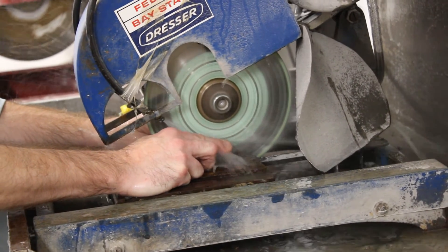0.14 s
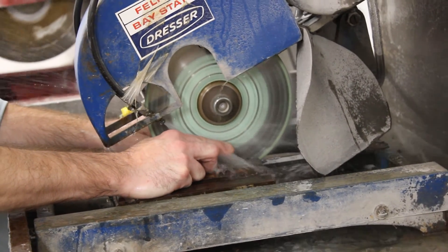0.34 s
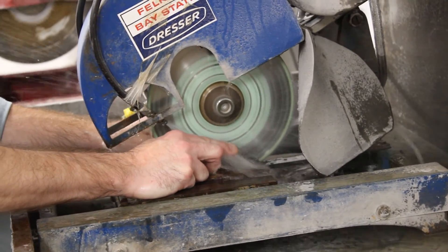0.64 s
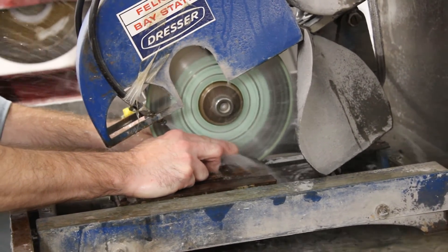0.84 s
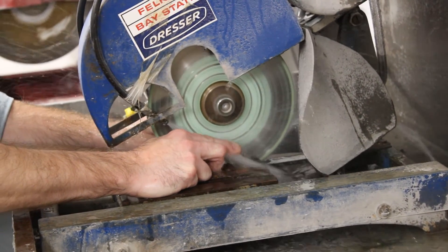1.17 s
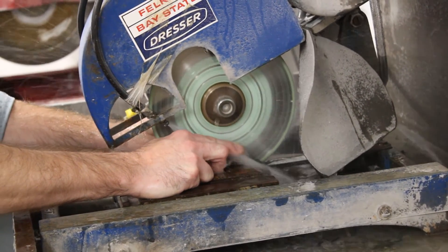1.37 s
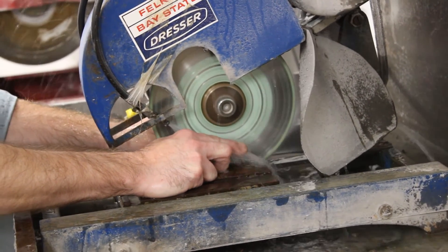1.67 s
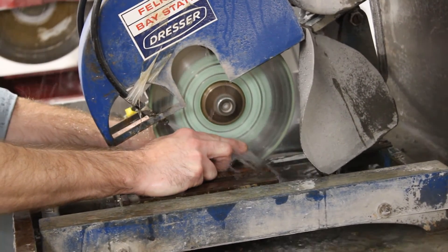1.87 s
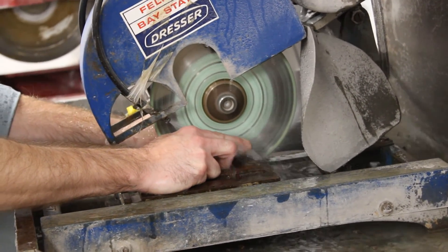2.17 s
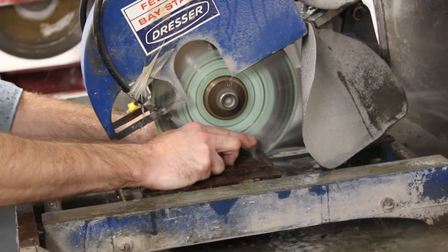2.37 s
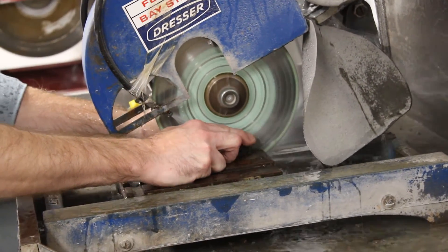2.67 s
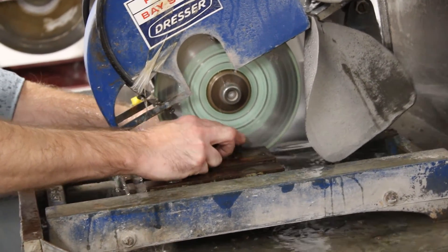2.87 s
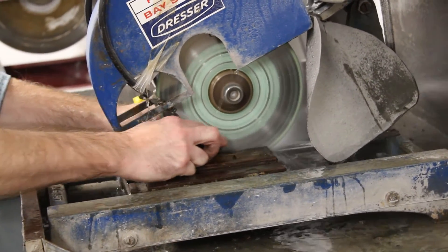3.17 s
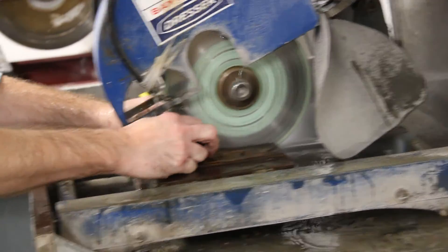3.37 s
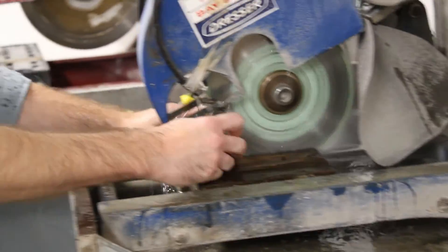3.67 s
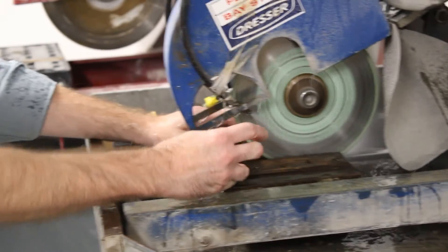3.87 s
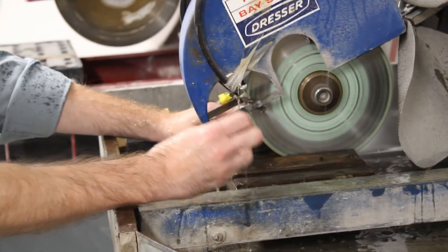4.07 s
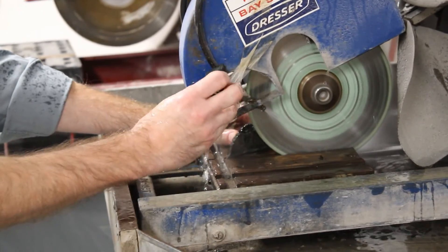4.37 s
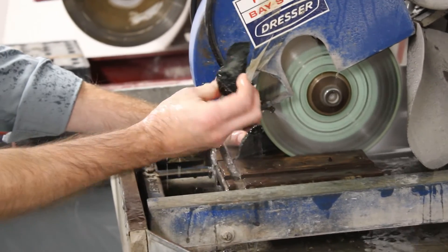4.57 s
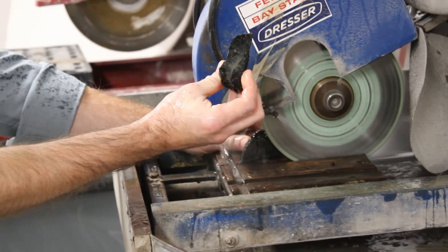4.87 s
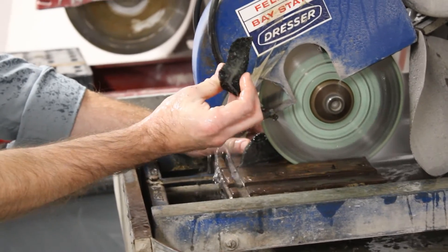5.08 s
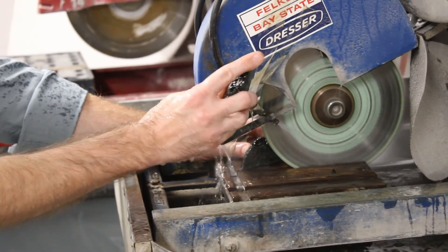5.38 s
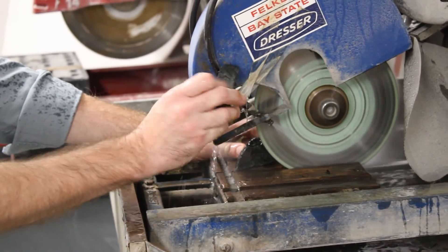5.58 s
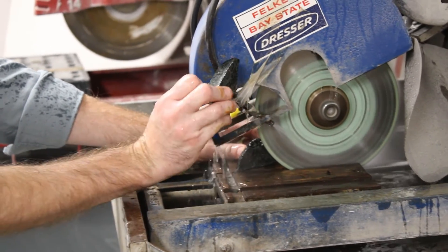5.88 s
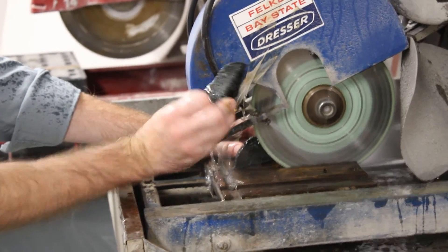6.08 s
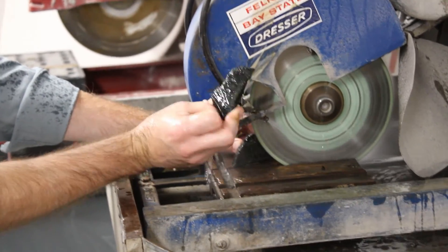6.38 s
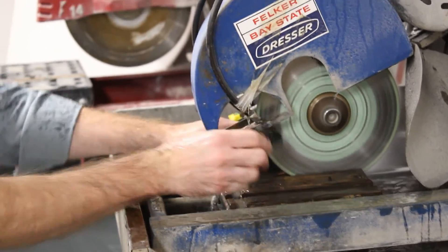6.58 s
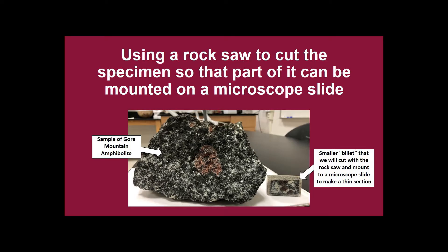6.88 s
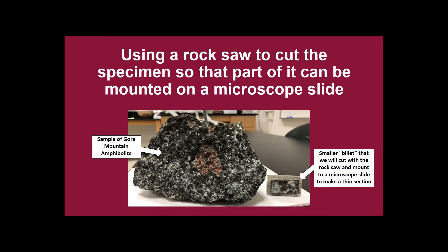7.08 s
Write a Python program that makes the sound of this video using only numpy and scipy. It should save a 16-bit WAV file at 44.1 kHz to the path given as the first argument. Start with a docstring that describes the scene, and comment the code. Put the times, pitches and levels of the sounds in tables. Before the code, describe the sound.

A water-cooled saw grinds harshly through stone, breaks free after three seconds, then spins on with hissing spray and whine until an abrupt cutoff.

```python
"""Wet stone saw, close by

A water-cooled diamond saw in a small workshop. Rough rim noise and grit impacts make the grinding; neighbouring
multiples of the turn rate make its throbbing drone. The rim breaks through after three seconds and spins on,
shuddering (noise through low disc modes), flinging water (random drops) against its hood over the hum and whine
of the motor (unsteady sines). The sound is switched off dead near the end.
"""
import sys
import numpy as np
from scipy import signal
from scipy.fft import rfft, irfft, next_fast_len
from scipy.io import wavfile
from scipy.ndimage import uniform_filter1d

SR = 44100
rng = np.random.default_rng(int(sys.argv[2]) if len(sys.argv) > 2 else 0)


def dump(signal):
    """Clip the signal to [-1, 1] and save it as 16-bit WAV at the path in sys.argv[1]."""
    limited = np.clip(np.atleast_2d(signal).T, -1, 1)
    pcm = np.round(limited * 32767).astype(np.int16)
    wavfile.write(sys.argv[1], SR, pcm)


N = 318824
TIME = np.arange(N) / SR   # s
SIZE = next_fast_len(N, True)
HZ = np.maximum(np.arange(SIZE // 2 + 1) * SR / SIZE, 1)   # frequency axis of every filter

# Course of the cut
FREE_S, STOP_S = 3.25, 6.9595   # the rim is through; the sound is switched off
DEEP_FROM_S, DEEP_BY_S = 0.3, 2.26   # the rim sinks into the stone between these moments
FREE_TURNS_PER_S, SAG_TURNS_PER_S = 46.82, 0.12   # turn rate without load; its loss at full load
# how hard the hand feeds the stone, used relative to its mean over the cut: t/s, level/dB
FEED = [(0.0, -23), (0.02, -22), (0.42, -20), (0.5, -23.5), (0.62, -20), (1.44, -22), (1.5, -20),
        (1.9, -23.5), (2.0, -22), (2.36, -23.5), (2.48, -20.5), (2.6, -27), (2.74, -21), (3.03, -24),
        (3.09, -19), (3.25, -22)]
# drag of the slot on the blade, greatest in the thick middle of the stone: t/s, load/0-1
LOAD = [(0.6, 0), (1.38, .55), (1.52, 0.97), (2.45, 0.99), (2.6, .5), (3.2, 0.09)]
# brief dips of water and blade together: start t/s, end t/s, added level/dB
DIPS = [(5.95, 6.04, -1.5)]

# Layer levels, before further changes in time:
# level in the stone/dB, level free of it/dB, added level at full load/dB, level per feed/(dB/dB)
SPRAY_LEVEL = (-23, -21.0, 0, .8)
MIST_LEVEL = (-40, -44.5, 1, 1.5)
RUSH_LEVEL = (-27, -27, 2, 1)
LOW_RING_LEVEL = (-32, -33.5, 2.5, .5)
HIGH_RING_LEVEL = (-30.5, -29, 1, 0.36)
HUM_LEVEL = (-53, -51.5, 5, 0.4)
WHINE_LEVEL = (-37.5, -36, 2, 0.1)

# Water: relative spectra of the hiss on the hood, the fine mist, and the rush in hood and tray:
# f/Hz, level per Hz/dB
SPRAY_SPECTRUM = [(1500, -18.5), (2200, -24.5), (2600, -8), (3350, -4), (4100, -6), (5500, -8), (6200, -3),
                  (7400, -0.5), (8300, -4.5), (9000, -12), (10000, -23.5), (13000, -34.5)]
MIST_SPECTRUM = [(7000, -7.5), (9500, 5.5), (11000, -2), (12500, -5), (14000, -10.5), (15300, -27)]
RUSH_SPECTRUM = [(25, -33.5), (70, -25.5), (100, -12.5), (160, -2), (300, -1), (400, -2), (540, 6.5),
                 (800, -1.5), (960, 1), (1200, -2.5), (1500, 1.5), (2100, -0.5), (2800, -8.5)]
# bright resonances of rim and hood, relative to one another: f/Hz, half-width/Hz, level/dB
RIM_MODES = [(3300, 170, -8), (6130, 18, -5), (6610, 34, -1.5), (6750, 49, 1), (7388, 270, 0.5),
             (7800, 62, -11), (8220, 98, -5), (9090, 34, -6)]
# the slot opens and lets out a burst of water
BURST_FROM_S, BURST_TO_S, BURST_SPRAY_DB, BURST_MIST_DB = 2.974, 3.56, 1.4, 8
SPRAY_FADE_DB_PER_S = 0.22   # the spray thins slowly once the blade is free
DEEP_MIST_DB, DEEP_RUSH_DB = -3, -0.5   # a deep slot smothers the mist and quietens the rush

# Grinding: relative spectra at the start of the cut and deep in it: f/Hz, level per Hz/dB
GRIT_SPECTRUM = [(1500, -25.5), (2300, -6), (2800, -3), (3600, -22.5), (4500, -0.5), (5500, 1.5), (6500, 3),
                 (8000, -5), (10000, -27.5)]
DEEP_GRIT_SPECTRUM = [(2000, -9), (2400, -7), (2750, 2), (3700, 3), (5400, 2), (6500, -3.5), (9000, -16),
                      (13000, -35)]
BITE_DB, BITE_PER_FEED = -24.5, 1.1   # basic level; dB per dB of feed
BITE_START_DB, BITE_SETTLE_S = 1.5, 1   # extra level at the first touch, gone after this time
DEEP_BITE_DB = 3   # a deep slot strengthens the rasp
# screeches of the rim pinched in the slot, before a common trim: start t/s, end t/s, f/Hz, level/dB
SCREECHES = [(0.0, 1.197, 5750, -37.5), (0.15, 0.5, 6400, -36), (0.0, 1.207, 6950, -32.5),
             (0.4, 1.452, 4520, -36.5), (1.42, 1.75, 2930, -33.5), (1.7, 2.3, 4400, -36),
             (2.3, 2.55, 3680, -32), (2.3, 3.0, 5400, -39.5), (2.35, 3.12, 2782, -33.5),
             (2.66, 2.998, 4800, -30), (2.68, 3.0, 3070, -37)]

# the drone's neighbouring tones: multiple of the turn rate
DRONE_ORDERS = (11, 13, 14, 15)
# their levels, a row each: light load level/dB, full load level/dB, added in a deep slot/dB, free level/dB
DRONE = [(-36.5, -35.5, -7.5, -39.5), (-44, -39.5, -0.5, -33.5), (-37.5, -27, 1, -26),
         (-45, -31.5, 1, -40.5)]
# single drone tones howl early in the cut: multiple of the turn rate, start t/s, end t/s, added level/dB
HOWLS = [(11, 0.56, 1.3, 7), (15, 1, 1.45, 4)]
# weaker tones of the out-of-true rim: multiple of the turn rate, level while cutting/dB, free level/dB
RIM_TONES = [(4.01, -52, -57), (6.874, -48.5, -60.5), (10.02, -50.5, -42), (12, -45.5, -47.5),
             (17, -50.5, -53.5), (19.07, -55.5, -45), (22, -59.5, -59.5), (23, -47, -53.5),
             (24.15, -52, -47.5), (29.14, -45, -41.5), (33, -49.5, -55), (39.97, -53, -38),
             (44.46, -40.5, -42.5)]
SPIN_UP_S = 0.8   # from the burst on, the drone takes this long to reach its free levels

# Steel disc: modes in two groups, relative to the group's level:
# f/Hz, half-width/Hz, level while cutting/dB, free level/dB
LOW_MODES = [(1317, 5, -4, -3.5), (1353, 6, 0, -1), (1385, 9, -8, -7)]
HIGH_MODES = [(1700, 4, -3.5, -6), (1734, 9, -13, -4.5), (1926, 5, -1.5, -10), (1900, 120, -19, -7),
              (2095, 50, -17, -15)]
# the disc sings up, most at the frequency given: f/Hz, start t/s, end t/s, added level/dB
SINGING = [(1897, 0.32, 1.36, 5.5), (1350, 1.57, 1.72, 3), (1700, 1.8, 2.1, 3.5), (1370, 2.16, 2.45, 5.5),
           (1920, 2.2, 2.4, 7), (1930, 2.67, 2.81, 8), (1350, 2.67, 2.81, 4.5), (1890, 3.7, 4.7, 2.5),
           (1735, 4.22, 5.45, 3), (1890, 5.55, 5.85, 5), (1875, 6.48, 6.85, 11)]
SINGING_REACH_HZ = 55   # sharp modes this close join in
# shudder modes of the freed blade, relative to one another: f/Hz, half-width/Hz, level/dB
SHUDDER_MODES = [(489, 3, -6), (517, 12, -11), (560, 35, -9), (587, 3, -2), (625, 28, 0), (660, 25, -6),
                 (728, 8, -12), (776, 8, -13)]
SHUDDER_DB, SHUDDER_FADE_DB_PER_S = -25, 0.57   # level as the rim comes free; its fade

# Motor and background
HUM_HZ, WHINE_HZ = 118.5, 1891
# swells of the hum: start t/s, end t/s, added level/dB
HUM_SWELLS = [(0.9, 1.45, 3), (4.22, 5.02, 13.5), (5.8, 6.85, 4)]
# faint low rumble: t/s, level/dB
RUMBLE = [(0, -76), (4.2, -76), (4.8, -62.5), (6.9, -64)]

CUTOFF_HZ = 15400   # top of the treble that is kept


def from_db(db):
    """Decibels to gain."""
    return 10 ** (np.asarray(db) / 20)


def rms_one(x):
    """Scale to unit rms."""
    return x / np.sqrt(np.mean(x ** 2) + 1e-20)


def in_time(rows):
    """Each column of a curve table at every sample."""
    s, *columns = np.transpose(rows)
    return [np.interp(TIME, s, column) for column in columns]


def window(start, end, edge_s):
    """Rise smoothly to 1 at the start and fall back at the end."""
    rise = np.tanh((TIME - start) / edge_s)
    fall = np.tanh((TIME - end) / edge_s)
    return 0.5 * (rise - fall)


def swells(rows, edge_s):
    """Decibels added by a table of swells."""
    return sum(db * window(start, end, edge_s) for start, end, db in rows)


def level(law, cutting, load, feed_db):
    """A layer's level in dB: one value in the stone, one free of it, changed by load and feed."""
    cut_db, free_db, load_db, per_feed = law
    return free_db + cutting * (cut_db - free_db) + load_db * load + per_feed * feed_db


def filtered(x, response):
    """Apply a frequency response given on HZ; rms 1."""
    return rms_one(irfft(rfft(x, SIZE) * response, SIZE)[:N])


def colour(x, spectrum):
    """Shape a sound by a spectrum that falls away beyond its ends; rms 1."""
    hz, level_db = np.transpose(spectrum)
    low_skirt = np.minimum(HZ / hz[0], 1) ** 2
    high_skirt = np.minimum(hz[-1] / HZ, 1) ** 4
    shape_db = np.interp(np.log(HZ), np.log(hz), level_db)
    return filtered(x, low_skirt * high_skirt * from_db(shape_db))


def resonate(x, hz, width):
    """A resonance with steep skirts, 6 dB down one width from its centre; rms 1."""
    return filtered(x, 1 / (1 + 1j * (HZ - hz) / width) ** 2)


def drift(rate):
    """Slow chance with spread 1, fading out above the rate in Hz."""
    return filtered(rng.standard_normal(N), 1 / (1 + (HZ / rate) ** 2))


def around_rim(turns, low, high):
    """An irregular profile round the rim, met again on each turn; low to high bumps per turn, rms 1."""
    size = 4096
    bumps = np.arange(size // 2 + 1)
    phases = np.exp(2j * np.pi * rng.random(len(bumps)))
    profile = irfft(phases * ((bumps >= low) & (bumps <= high)))
    return rms_one(np.interp(turns % 1, np.arange(size) / size, profile, period=1))


def rim_texture(turns):
    """The fine roughness of the rim as it passes."""
    return around_rim(turns, 3, 340)


def grains(per_s, spread_db):
    """Tiny impacts at random moments, a few much harder than the rest; rms 1."""
    sizes = from_db(spread_db * np.minimum(rng.exponential(1, N), 6))
    signs = rng.choice([-1, 1], N)
    struck = rng.random(N) < per_s / SR
    return rms_one(sizes * signs * struck)


def blend(repeating, fresh, share):
    """Mix what repeats each turn with what is new; share is of the power."""
    share = np.clip(share, 0, 1)
    return np.sqrt(share) * repeating + np.sqrt(1 - share) * fresh


def contact(turns, wobble_db, notch_db, flutter_db):
    """The rim presses harder once a turn, catches on its own high spots and flutters."""
    wobble = wobble_db * np.cos(2 * np.pi * turns)
    notches = notch_db * around_rim(turns, 2, 14)
    return from_db(wobble + notches + flutter_db * drift(18))


def hood(x, ripple_db):
    """Many close reflections in the steel hood comb the sound into narrow peaks and dips."""
    knots = np.arange(0, SR / 2, 55)   # Hz
    ripple = np.interp(HZ, knots, rng.standard_normal(len(knots)))
    return filtered(x, from_db(ripple_db * ripple))


def spray(turns, cutting, spray_db, mist_db):
    """Drops flung off the rim pelt the hood; the bright modes of the rim ring once the stone lets go."""
    drops = grains(per_s=12000, spread_db=2.5)
    drops = drops * contact(turns, wobble_db=1.0, notch_db=1.5, flutter_db=0.5)
    drops = hood(drops, ripple_db=2.0)
    hiss = colour(blend(rim_texture(turns), drops, share=0.079), SPRAY_SPECTRUM)
    modes = sum(from_db(db) * resonate(drops, hz, width) for hz, width, db in RIM_MODES)
    ring = (1 - cutting) * from_db(-9.5) * rms_one(modes)
    mist = colour(drops, MIST_SPECTRUM)
    return from_db(spray_db) * (hiss + ring) + from_db(mist_db) * mist


def rush(turns, cutting, rush_db):
    """Water and vibration rumble in hood and tray, with more regular buzz while the stone rubs."""
    buzz = around_rim(turns, 17, 340)
    shake = blend(buzz, rng.standard_normal(N), share=0.14 + 0.34 * cutting)
    return from_db(rush_db) * colour(shake, RUSH_SPECTRUM)


def screeches(chips):
    """Where the slot pinches the rim, one of its modes swells roughly out of the rasp."""
    out = 0
    for start, end, hz, level_db in SCREECHES:
        arch = 4 * (TIME - start) * (end - TIME) / (end - start) ** 2
        pinch = np.sqrt(np.clip(arch, 0, 1))
        unsteady_db = level_db - 0.5 + 2 * drift(14)   # common trim of -0.5 dB
        out = out + pinch * from_db(unsteady_db) * resonate(chips, hz, width=150)
    return out


def grinding(turns, cutting, depth, feed_db):
    """Diamonds chip the stone, partly at the same places on every turn; the rasp deepens with the slot."""
    first_touch_db = BITE_START_DB * np.maximum(1 - TIME / BITE_SETTLE_S, 0)
    bite_db = BITE_DB + first_touch_db + DEEP_BITE_DB * depth + BITE_PER_FEED * feed_db
    chips = blend(rim_texture(turns), grains(per_s=6000, spread_db=2.5), share=0.42)
    chips = chips * contact(turns, wobble_db=1.5, notch_db=2.0, flutter_db=1.5)
    combed = hood(chips, ripple_db=2.4)
    rasp = (1 - depth) * colour(combed, GRIT_SPECTRUM) + depth * colour(combed, DEEP_GRIT_SPECTRUM)
    stone_left = np.interp(TIME, [BURST_FROM_S, FREE_S], [1, 0.3])
    return cutting * stone_left * from_db(bite_db) * rasp + screeches(chips)


def drone(turns, cutting, load, depth):
    """Neighbouring multiples of the turn rate throb once a turn; load and depth shift them upwards."""
    out = 0
    unsteady_db = 0.7 * drift(14)
    freed = np.clip((TIME - BURST_FROM_S) / SPIN_UP_S, 0, 1)
    for multiple, (light_db, full_db, deep_db, free_db) in zip(DRONE_ORDERS, DRONE):
        cut_db = light_db + load * (full_db - light_db) + depth * deep_db
        howls = [row[1:] for row in HOWLS if round(row[0]) == multiple]
        level_db = (1 - freed) * cut_db + freed * free_db + swells(howls, edge_s=0.046)
        out = out + from_db(level_db + unsteady_db) * np.cos(2 * np.pi * multiple * turns)
    for multiple, cut_db, free_db in RIM_TONES:
        level_db = free_db + cutting * (cut_db - free_db) + 3.3 * drift(4.6)
        out = out + from_db(level_db) * np.cos(2 * np.pi * (multiple * turns + rng.random()))
    return np.sqrt(2) * out   # levels are rms


def singing(hz, width):
    """Decibels that the singing adds to a mode; distant or broad modes take little of it."""
    rows = []
    for centre, start, end, db in SINGING:
        nearness = np.exp(-((hz - centre) / SINGING_REACH_HZ) ** 2)
        rows.append((start, end, db * nearness))
    return swells(rows, edge_s=0.04) / (1 + (width / SINGING_REACH_HZ) ** 2)


def disc(cutting, low_db, high_db):
    """Rubbing keeps the steel disc ringing fairly evenly; the stone favours some modes and damps others."""
    out = 0
    rub = rng.standard_normal(N)
    for modes, group_db in ((LOW_MODES, low_db), (HIGH_MODES, high_db)):
        for hz, width, cut_db, free_db in modes:
            ring = resonate(rub, hz, width)
            even = ring / np.sqrt(uniform_filter1d(ring ** 2, size=6000) + 0.35)   # tames its swelling
            mode_db = group_db + free_db + cutting * (cut_db - free_db) + singing(hz, width)
            out = out + from_db(mode_db) * even
    return out


def motor(hum_db, whine_db):
    """A low hum and a thin whine, both slightly unsteady."""
    hum_phase = 2 * np.pi * HUM_HZ * TIME + 0.15 * drift(5)
    hum = from_db(hum_db) * np.sin(hum_phase)
    whine_gain = from_db(whine_db + 2.2 * drift(4.7))
    whine = whine_gain * np.sin(2 * np.pi * WHINE_HZ * TIME + 0.5 * drift(3.6))
    return np.sqrt(2) * (hum + whine)   # levels are rms


def rumble():
    """A faint rumble below the motor hum: noise through a broad low resonance."""
    return from_db(in_time(RUMBLE)[0]) * resonate(rng.standard_normal(N), 55, 35)


def shudder(cutting):
    """Out of the slot, the blade flaps in its low modes and slowly calms."""
    level_db = SHUDDER_DB - SHUDDER_FADE_DB_PER_S * (TIME - FREE_S)
    modes = sum(from_db(db) * resonate(rng.standard_normal(N), hz, width) for hz, width, db in SHUDDER_MODES)
    return (1 - cutting) * from_db(level_db) * rms_one(modes)


def scene():
    """The turning blade carries the cut; feed, load and slot depth set the levels until it is through."""
    cutting = 0.5 - 0.5 * np.tanh((TIME - FREE_S) / 0.03)   # 1 in the stone, 0 free of it
    load = cutting * np.clip(in_time(LOAD)[0], 0, 1)
    feed_db, = in_time(FEED)
    feed_db = cutting * (feed_db - np.average(feed_db, weights=cutting))
    effort = cutting, load, feed_db
    turns = np.cumsum(FREE_TURNS_PER_S - SAG_TURNS_PER_S * load) / SR
    depth = np.interp(TIME, [DEEP_FROM_S, DEEP_BY_S], [0, 1])
    buried = depth * window(0, BURST_FROM_S, edge_s=0.04)
    burst = window(BURST_FROM_S, BURST_TO_S, edge_s=0.05)

    spray_db = level(SPRAY_LEVEL, *effort) + BURST_SPRAY_DB * burst
    spray_db = spray_db - SPRAY_FADE_DB_PER_S * np.maximum(TIME - FREE_S, 0)
    mist_db = level(MIST_LEVEL, *effort) + DEEP_MIST_DB * buried
    mist_db = mist_db + BURST_MIST_DB * burst * (1 - cutting)
    rush_db = level(RUSH_LEVEL, *effort) + DEEP_RUSH_DB * buried
    water = spray(turns, cutting, spray_db, mist_db) + rush(turns, cutting, rush_db)

    blade = grinding(turns, cutting, depth, feed_db) + drone(turns, cutting, load, depth)
    blade = blade + disc(cutting, level(LOW_RING_LEVEL, *effort), level(HIGH_RING_LEVEL, *effort))
    blade = blade + shudder(cutting)

    hum_db = level(HUM_LEVEL, *effort) + swells(HUM_SWELLS, edge_s=0.09)
    whine_db = level(WHINE_LEVEL, *effort) + singing(WHINE_HZ, width=0)
    dips = from_db(swells(DIPS, edge_s=0.015))
    mix = dips * (water + blade) + motor(hum_db, whine_db) + rumble()
    return mix[None]   # one microphone channel


def record(dry):
    """The sound is cut off dead, and a steep low-pass removes the top of the treble."""
    cut = dry * (TIME < STOP_S) + 1e-18
    low_pass = signal.ellip(12, 0.1, 90, CUTOFF_HZ, fs=SR, output="sos")
    return signal.sosfilt(low_pass, cut)


dry = scene()
out = record(dry)
dump(out)
```